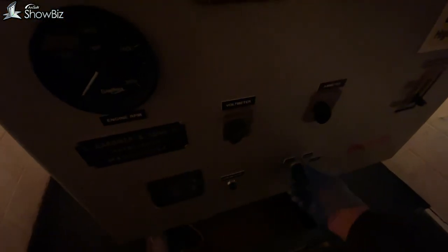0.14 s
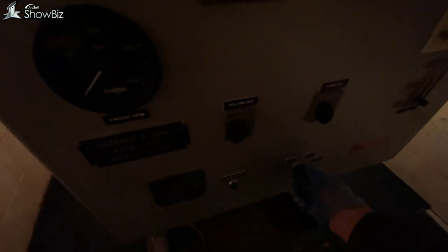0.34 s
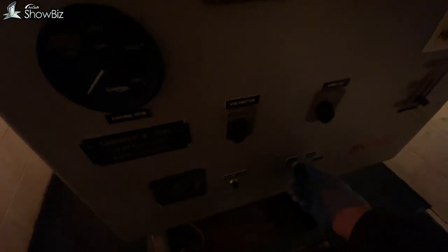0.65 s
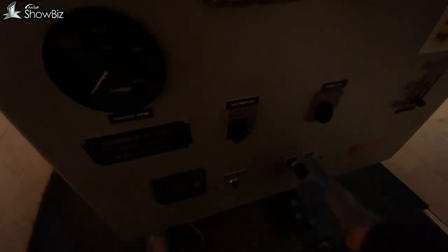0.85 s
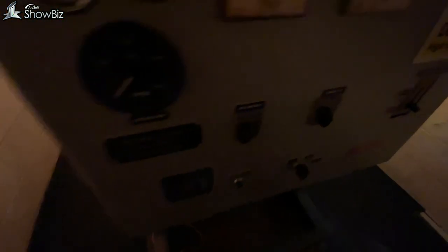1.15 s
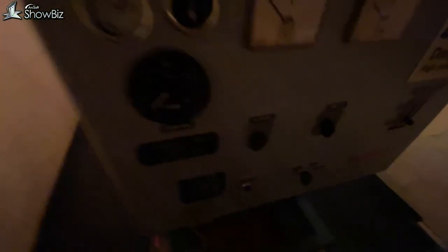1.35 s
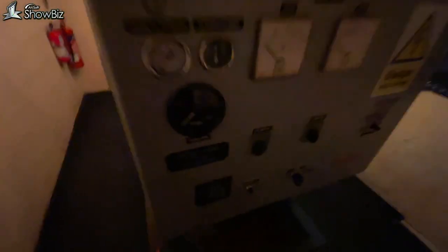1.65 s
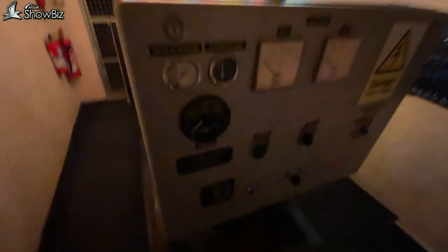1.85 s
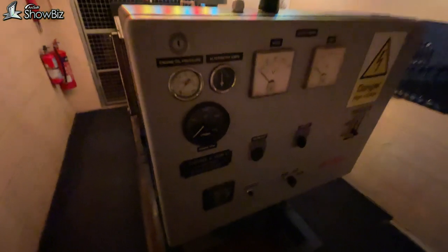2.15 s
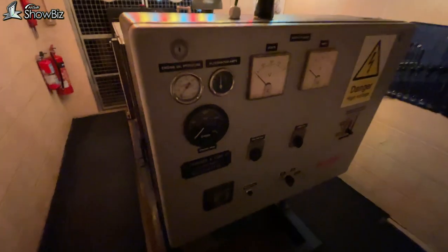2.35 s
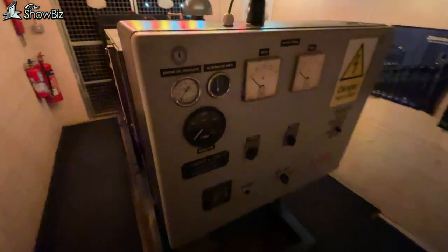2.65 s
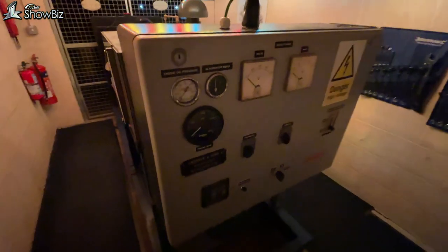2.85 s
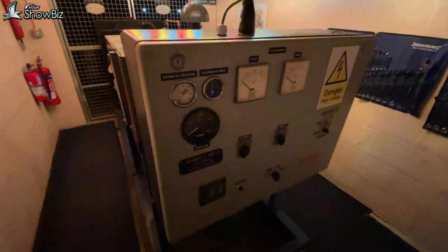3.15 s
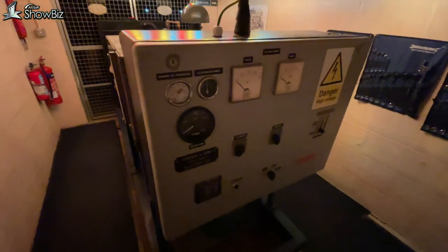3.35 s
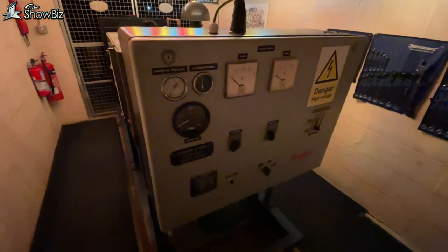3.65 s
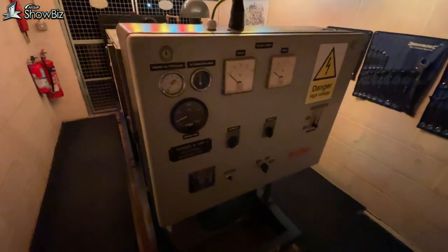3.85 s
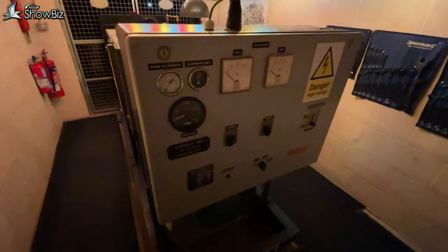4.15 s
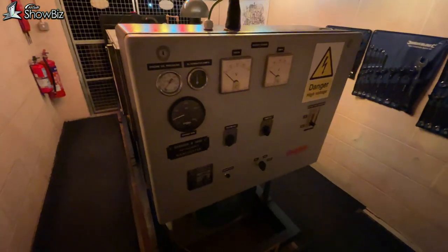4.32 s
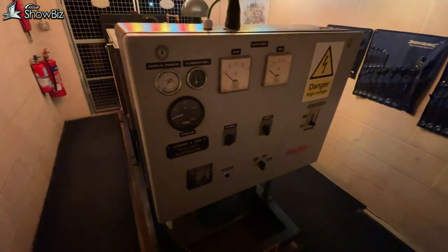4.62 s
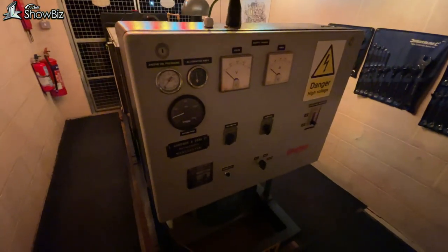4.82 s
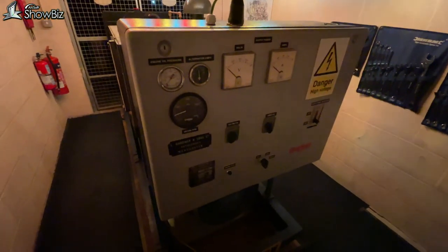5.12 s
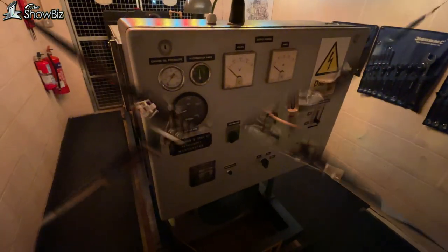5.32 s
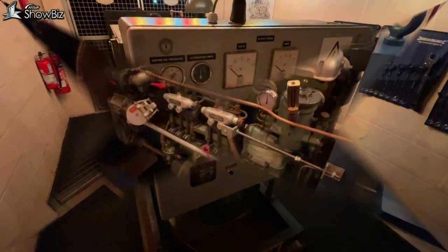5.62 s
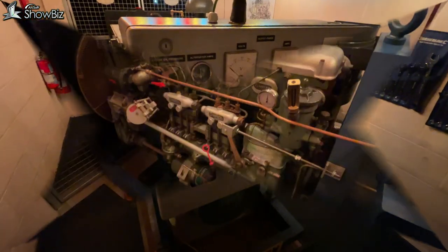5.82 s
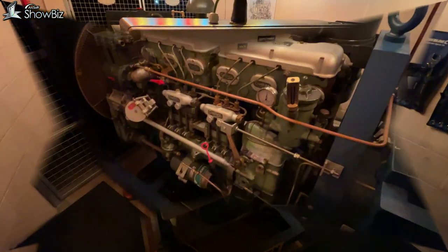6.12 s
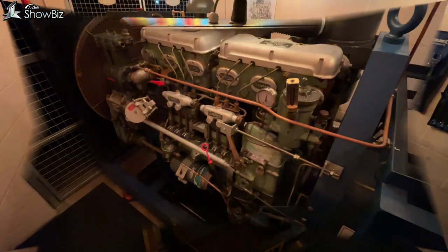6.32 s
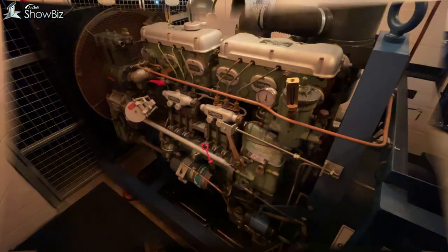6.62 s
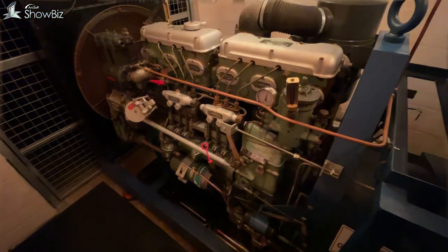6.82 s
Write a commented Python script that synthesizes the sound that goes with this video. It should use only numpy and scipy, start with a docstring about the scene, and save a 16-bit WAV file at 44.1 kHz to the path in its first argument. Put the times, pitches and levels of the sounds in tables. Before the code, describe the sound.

In a small hard-walled shed, a heavy diesel engine cranks into life, settles to clattering idle, then suddenly sounds closer with deep hum and belt squeaks.

```python
"""A solenoid clacks and a starter crashes into mesh and whines, in a small, hard-walled engine shed.
A big six-cylinder diesel catches, flares and hunts round a slow idle, heard from behind the control panel.
From 5.3 s the microphone is right beside the block: settled idle, deep hum under the knocking, belt squeaks.
Noise impacts through filters make the metal and hiss; decaying modes ring, and swept sines whine and chirp."""
import sys
import numpy as np
from scipy import signal
from scipy.fft import rfft, irfft, next_fast_len
from scipy.io import wavfile
from scipy.ndimage import uniform_filter1d

SR = 44100
rng = np.random.default_rng(int(sys.argv[2]) if len(sys.argv) > 2 else 0)


def wav_out(sig):
    """Save sig, one row per channel (or a flat mono array), as 16-bit PCM at SR to the path in sys.argv[1]."""
    wavfile.write(sys.argv[1], SR, np.round(np.clip(np.atleast_2d(sig).T, -1, 1) * 32767).astype(np.int16))


N = 307377
TIME = np.arange(N) / SR

# Solenoid, then pinion. Each row: start in s, level in dB, time before the chatter dies in s,
# treble tilt in dB per octave.
CLACKS = [(0.059, -23.5, 0.023, -0.5), (0.123, -21, 0.054, -9.5), (0.137, -17.5, 0.017, 5.5)]
# Compression strokes while cranking. Each row: time in s, scraping in dB, thud in dB.
STROKES = [(.39, -34, -27), (0.58, -25, -28), (0.756, -30.5, -54), (.89, -52, -54), (1.01, -57, -49),
           (1.11, -37, -35)]
# Resonances of the knocking and hissing metal, with a thin whistle near 5.4 kHz.
# Each row: frequency in Hz, width in Hz, lift in dB.
BLOCK_MODES = [(1010, 61, 3.5), (1140, 79, 8.5), (1426, 100, -2.5), (1980, 92, 0), (2010, 230, 4.5),
               (2254, 81, 3), (3110, 120, 4), (3416, 91, -0.5), (5420, 20, 7.5)]
# Sharp edge of a firing. Each row: frequency in Hz, relative level in dB per Hz.
TICK = [(600, -32), (1500, -10), (2200, 0), (2700, 1), (3300, 2), (4000, -7.5), (5500, -22), (9000, -20.5),
        (13000, -52)]

MESH_S, RELIEF_S, FREE_S = 0.1124, 0.68, 0.9  # pinion enters the ring gear, is relieved, lets go
BALANCE_DB = 4  # spread in strength among the modes of a blow, and from slap to slap


def amp(db):
    """Turns dB into a gain."""
    return np.exp(np.asarray(db) * (np.log(10) / 20))


def evened(x):
    """Scales to rms 1."""
    return x / np.sqrt(np.mean(x ** 2) + 1e-20)


def read(points, hz):
    """Reads a spectrum on a log-frequency axis."""
    f, value = np.transpose(points)
    return np.interp(np.log(hz + 1), np.log(f + 1), value)


def curves(rows):
    """One curve over time for each column after the first, which is in seconds."""
    s, *columns = np.transpose(rows)
    return [np.interp(TIME, s, c) for c in columns]


def fade_in(s, length):
    """Rises from 0 to 1, starting at s."""
    return np.clip((TIME - s) / length, 0, 1)


def held(s, rise, until, decay):
    """Rises at s, holds, then dies away."""
    return fade_in(s, rise) * np.exp(-np.clip((TIME - until) / decay, 0, 30))


def swell(s, width):
    """A smooth hump centred on s."""
    return np.exp(-.5 * ((TIME - s) / width) ** 2)


def convolve(x, response):
    """Passes x through an impulse response."""
    x = np.atleast_2d(x + 1e-12).astype(np.float32)
    response = np.atleast_2d(response + 1e-12).astype(np.float32)
    return signal.oaconvolve(x, response, axes=1)[:, :N].astype(float)


def wobble(size, channels=1):
    """Smoothed noise, averaged over size samples; rms 1."""
    return evened(uniform_filter1d(rng.standard_normal((channels, N)), size=size))


def waver(size):
    """Two unrelated wobbles that turn about every size samples; rms 1."""
    steps = np.arange(0, N + size, size)
    targets = rng.standard_normal((2, len(steps)))
    return evened(np.array([np.interp(TIME, steps / SR, row) for row in targets]))


def grit(grain_db=0):
    """Two noises made of tiny impacts whose sizes spread by grain_db."""
    sizes = np.repeat(amp(grain_db * rng.standard_normal(N // 32 + 1)), 32)[:N]
    return evened(rng.standard_normal((2, N), dtype=np.float32) * sizes)


def lift(modes, hz):
    """dB that a set of resonances adds at a frequency."""
    return sum(db / (1 + (2 * (hz - f) / width) ** 2) for f, width, db in modes)


def colour(x, spectrum, modes=()):
    """Causal filter: a broad spectrum with narrow resonances standing on it; rms 1."""
    hz = abs(np.fft.fftfreq(8192, 1 / SR))
    db = read(spectrum, hz) + lift(modes, hz)
    # minimum phase: the response starts at once and never rings ahead of a blow
    response = np.fft.ifft(np.exp(np.conj(signal.hilbert(np.log(amp(db)))))).real
    return evened(convolve(x, response[:len(hz) // 2]))


def ring(x, modes):
    """Drives a set of modes that die faster the wider they are; rms 1."""
    t = TIME[:SR // 2]
    response = 0
    for hz, width, db in modes:
        dying = np.exp(-np.pi * width * t)
        response = response + amp(db) * np.sqrt(width) * dying * np.sin(2 * np.pi * hz * t)
    return evened(convolve(x, response))


def sing(modes):
    """Modes kept ringing at an even strength, each wandering in pitch in scale with its width; rms 1."""
    out = np.zeros((2, N))
    for hz, width, db in modes:
        pitch = hz + .5 * width * waver(size=400)
        out += amp(db) * np.sin(2 * np.pi * np.cumsum(pitch, axis=1) / SR)
    return evened(out)


def blows(times, db, rise, decay):
    """Envelope of a series of blows, each swelling and dying; rms 1."""
    train, t = np.zeros(N), TIME[:SR // 3]
    np.add.at(train, np.clip(np.round(times * SR).astype(int), 0, N - 1), amp(db))
    return evened(convolve(train, (1 - np.exp(-t / rise)) * np.exp(-t / decay))[0])


def shed(x, wet_db):
    """Adds the dense, short echo of the walls: noise that dies at its own rate in each band."""
    # Echo of the shed. Each row: frequency in Hz, time to fall by 60 dB in s.
    echo_times = [(60, 0.22), (300, 0.47), (1000, 0.38), (4000, 0.17), (12000, 0.021)]
    hz, t, z = signal.stft(rng.standard_normal((2, SR // 2)), SR, nperseg=256)
    tail = signal.istft(z * amp(-60 * t / read(echo_times, hz)[:, None]), SR)[1]
    echo = convolve(x, tail / np.linalg.norm(tail[0]))
    return (x + amp(wet_db) * echo) / np.hypot(1, amp(wet_db))


def background():
    """The steady noise floor of the shed: filtered noise, weighted to the bass."""
    # Noise floor. Each row: frequency in Hz, relative level in dB per Hz.
    floor_spectrum = [(20, -4), (50, 1), (150, -8.5), (300, -17), (800, -16), (3000, -28.5), (12000, -34)]
    return amp(-44) * colour(grit(), floor_spectrum)


def belt(length=0.05, start_hz=770, end_hz=830, tremble=0.025, squeak_db=-14.5, wet_db=-5):
    """About once an engine cycle at idle the belt squeaks: a short, unsteady tone that slides upward."""
    first_s, period_s = 5.518, .2615
    progress = (np.maximum(TIME - first_s, 0) % period_s / length).clip(0, 1)
    hz = (start_hz + (end_hz - start_hz) * progress) * (1 + tremble * wobble(250)[0])
    tone = np.sqrt(2) * np.sin(2 * np.pi * np.cumsum(hz) / SR)
    return shed(amp(squeak_db) * np.sin(np.pi * progress) * tone, wet_db)


def coasting(width=.016, tremble=.016, wet_db=-7):
    """The overrunning pinion chirps thinly, drifting lower, as it runs down: trembling sines in humps."""
    # Pinion chirps. Each row: centre in s, pitch in Hz, level in dB.
    chirps = [(.745, 4130, -35), (.875, 4230, -36), (.905, 4170, -40), (.985, 3930, -38), (1.07, 3880, -39),
              (1.145, 3900, -39), (1.21, 3830, -45)]
    hz = curves(chirps)[0] * (1 + tremble * wobble(100, channels=2))
    turns = np.cumsum(hz, axis=1) / SR
    level = sum(amp(db) * swell(s, width) for s, _, db in chirps)
    return shed(level * np.sin(2 * np.pi * turns), wet_db)


def ratchet(width=0.016, wet_db=-6):
    """With the load off, the loose pinion rattles against the teeth in short bursts of ringing grit."""
    # Bursts of rattle. Each row: centre in s, level in dB.
    bursts = [(.665, -47), (.74, -22.5), (.82, -28), (.885, -26.5)]
    # What the loose pinion rattles with. Each row: frequency in Hz, width in Hz, level in dB.
    rattle_modes = [(578, 26, 7), (860, 23, 10), (1050, 57, -5), (1240, 120, -7), (1620, 90, 9)]
    level = sum(amp(db) * swell(s, width) for s, db in bursts)
    return shed(level * ring(grit(grain_db=2), rattle_modes), wet_db)


def flywheel(rubbed_db=-33, rubbed_decay=0.05, strike_rise=0.0042, strike_decay=0.039):
    """The ring gear sings while the pinion rubs it, and rings out when struck."""
    # The pinion strikes going in and coming out. Each row: start in s, level in dB.
    strikes = [(.145, -16.5), (.8, -19), (.854, -20)]
    # Modes of the ring gear. Each row: frequency in Hz, width in Hz, level in dB.
    ring_gear_modes = [(567, 26, 5.5), (843, 28, -10), (1220, 40, -6.5), (1630, 57, -10)]
    level = amp(rubbed_db) * held(CLACKS[0][0], 0.043, FREE_S, rubbed_decay)
    level = level + sum(amp(db) * held(s, strike_rise, s + strike_rise, strike_decay) for s, db in strikes)
    return level * sing(ring_gear_modes)


def solenoid(wet_db=-4, rattle_decay=0.024):
    """Steel slams on steel and chatters for a moment: short bursts of filtered grit."""
    # Steel on steel. Each row: frequency in Hz, relative level in dB per Hz.
    clack_spectrum = [(120, -29.5), (300, -1.5), (550, 10), (1100, -1), (1620, 9.5), (2000, -11),
                      (3000, -6), (5500, -9), (7500, -20), (11500, -11), (12800, -57)]
    out = np.zeros((2, N))
    for s, db, length, tilt_db in CLACKS:
        chatter = held(s, 0.0027, s + length, rattle_decay)
        spectrum = [(f, level + tilt_db * np.log2(f / 1000)) for f, level in clack_spectrum]
        burst = colour(grit(grain_db=-2.5) * chatter, spectrum)
        out += amp(db) * np.sqrt(np.mean(chatter ** 2)) * burst
    return shed(out, wet_db)


def gear_whine(mesh_hz, teeth, whine_db=-18.0, rise=0.14, limp=0.23, wet_db=-5):
    """Tooth mesh sounds eight wavering harmonics through the starter housing, which rings on after them."""
    # How strongly the housing radiates each harmonic of the mesh. Each row: frequency in Hz, level in dB.
    radiation = [(150, -12), (200, -6), (240, -2), (290, -1), (360, -2), (460, -3), (580, -.5), (720, 2),
                 (840, 5.5), (930, -2), (1070, 3), (1170, 3), (1260, 0), (1380, -1), (1480, -9), (1820, -7),
                 (2300, -22)]
    # The housing rings on as the whine sweeps past. Each row: frequency in Hz, width in Hz, level in dB.
    housing_modes = [(283.8, 7, 0)]
    end_s, decay_s = .622, .014  # the whine stops as the load comes off
    flicker_db, slip = 2.5, .04  # waver of each harmonic in level and in phase (turns, growing with order)
    harmonics = []
    for k in range(1, 9):
        level = amp(read(radiation, k * mesh_hz)) * amp(flicker_db * waver(size=300))
        phase = k * teeth + rng.random((2, 1)) + slip * np.sqrt(k - 1) * waver(size=200)
        harmonics.append(level * np.cos(2 * np.pi * phase))
    # every other tooth bites harder
    whine = harmonics[0] + sum(harmonics[1:]) * (1 + limp * np.cos(np.pi * teeth))
    whine = amp(whine_db) * evened(whine) * held(MESH_S, rise, end_s, decay_s)
    housing = amp(-15) * np.sqrt(np.mean(whine ** 2)) * ring(whine, housing_modes)
    return shed(whine + housing, wet_db)


def starter(crash_db=3, crash_hold=0.053, crash_decay=0.014, grind_db=-21.5, grind_rise=0.04,
            scrape_db=-36.5, stroke_width=0.043, flutter=0.0078, wet_db=-5):
    """Pinion teeth whine, grind and scrape on the ring gear at an uneven speed set by the cranking load."""
    # Starter gear mesh. Each row: time in s, teeth meeting per second in Hz.
    mesh = [(.13, 150), (.2, 190), (.25, 238), (.3, 268), (.34, 296), (.38, 354), (.415, 363), (.445, 350),
            (.475, 304), (.5, 288), (.52, 305), (.548, 412), (.59, 460), (.61, 462), (.632, 416),
            (.665, 400), (.72, 310)]
    # Grinding teeth. Each row: frequency in Hz, relative level in dB per Hz.
    grind_spectrum = [(60, -14), (170, -10), (280, -4), (560, 3.5), (900, 4), (1300, 1), (1800, -8.5),
                      (2600, -12), (5000, -33)]
    # Scraping teeth. Each row: frequency in Hz, relative level in dB per Hz.
    scrape_spectrum = [(1200, -33), (2500, 4), (4200, 3.5), (6000, -6), (7200, -8.5), (11500, -15.5),
                       (12600, -73)]
    # What the scraping teeth ring. Each row: frequency in Hz, width in Hz, lift in dB.
    scrape_modes = [(1810, 60, 6), (3130, 90, 2), (3315, 60, 4), (4085, 90, 2.5), (5040, 50, 4),
                    (5900, 160, 3)]
    grind_decay_s, scrape_decay_s = .4, .14  # both ease off once the pinion is relieved
    mesh_hz, = curves(mesh)
    teeth = np.cumsum(mesh_hz * (1 + flutter * wobble(200)[0])) / SR

    # each tooth strikes as it enters, some harder than others, and rubs between bites
    bite = amp(4 * rng.standard_normal(N).clip(-2, 2))[teeth.astype(int)]
    contact = .2 + bite * np.exp(-(teeth % 1) / .14)  # the bite dies in a fraction of a tooth
    # the teeth meet hardest at first
    crash = 1 + amp(crash_db) * held(MESH_S, grind_rise, MESH_S + crash_hold, crash_decay)
    grind = amp(grind_db) * crash * held(MESH_S, grind_rise, RELIEF_S, grind_decay_s)
    scrape = amp(scrape_db) * held(MESH_S, grind_rise, RELIEF_S, scrape_decay_s)
    scrape = scrape + sum(amp(db) * swell(s, stroke_width) for s, db, _ in STROKES)
    noise = grind * shed(colour(grit() * contact, grind_spectrum), wet_db)
    noise += scrape * shed(colour(grit() * np.sqrt(contact), scrape_spectrum, scrape_modes), wet_db)
    # the noise dies once the pinion is free
    return gear_whine(mesh_hz, teeth) + noise * held(MESH_S, grind_rise / 2, FREE_S, .09)


def cranking(thud_lead=0.032, thud_rise=0.0052, thud_decay=0.029, clank_rise=0.0057, clank_decay=.024,
             crack_decay=0.023, cough_decay=0.02, wet_db=-6):
    """Compression strokes thud through the frame, and the first firings cough, clank and crack."""
    # First firings, growing unevenly. Each row: start in s, clank in dB, crack in dB, thud in dB.
    first_firings = [(0.977, -23, -42, -40), (1.015, -28, -51, -33), (1.058, -26, -45, -34),
                     (1.088, -25, -47, -28), (1.113, -39, -52, -24.5), (1.135, -18, -32.5, -34),
                     (1.203, -20.5, -32, -41), (1.271, -24.5, -38, -33), (1.32, -20.5, -25, -31),
                     (1.388, -24, -38, -29), (1.468, -26, -24.5, -30), (1.546, -33, -31, -23)]
    # What the frame thuds with. Each row: frequency in Hz, width in Hz, level in dB.
    frame_modes = [(59.3, 46, 14), (129, 38, -1)]
    # What the first firings clank with. Each row: frequency in Hz, width in Hz, level in dB.
    clank_modes = [(550, 180, -18), (874, 45, 5), (1180, 64, 5), (1335, 69, 5)]
    # What they thud with. Each row: frequency in Hz, width in Hz, level in dB.
    cough_modes = [(125, 23, 0)]
    thuds = clanks = cracks = coughs = 0
    for s, _, db in STROKES:
        start = s - thud_lead
        thuds = thuds + amp(db) * held(start, thud_rise, start + thud_rise, thud_decay)
    for s, clank_db, crack_db, thud_db in first_firings:
        clanks = np.hypot(clanks, amp(clank_db) * held(s, clank_rise, s + clank_rise, clank_decay))
        cracks = np.hypot(cracks, amp(crack_db) * held(s, clank_rise, s + clank_rise, crack_decay))
        coughs = np.hypot(coughs, amp(thud_db) * held(s, thud_rise, s + thud_rise, cough_decay))
    metal = clanks * ring(grit(), clank_modes)
    metal += cracks * colour(grit(grain_db=2.5), TICK, BLOCK_MODES)
    return shed(thuds * ring(grit(), frame_modes) + metal, wet_db) + coughs * sing(cough_modes)


def exhaust_pipe(times, halfway, strength, intake_db=-2, turbulence=3, puff_spread_db=1.6):
    """Exhaust and intake each puff once a firing into the silencer, which booms on between puffs."""
    # Puffs. Each row: frequency in Hz, relative level in dB per Hz.
    exhaust_spectrum = [(15, -38.5), (30, -10), (44, 1), (58, 10), (78, -1.5), (100, -11.5), (150, -51),
                        (400, -62)]
    # Boom of the silencer. Each row: frequency in Hz, width in Hz, lift in dB.
    silencer_modes = [(59.7, 19, 5.5), (84.3, 10, 8)]
    sizes = np.r_[strength - strength.mean(), np.full(len(halfway), intake_db)]
    sizes = sizes + puff_spread_db * rng.standard_normal(len(sizes))
    puffs = blows(np.r_[times, halfway], sizes, rise=0.001, decay=0.0057)
    return colour(puffs - puffs.mean() + turbulence * puffs * grit(), exhaust_spectrum, silencer_modes)


def knocks(times, db, rise, detune=.025):
    """Each blow rings the block's modes with a balance and tuning of its own; rms 1."""
    # What a combustion knock rings in the block. Each row: frequency in Hz, width in Hz, level in dB.
    knock_modes = [(1020, 26, 3), (1080, 27, -1), (1160, 30, 2), (1253, 28, 0.5), (1366, 28, -5.5),
                   (1467, 26, 0), (1597, 22, -7.5), (1821, 42, -2), (1925, 35, -1), (2017, 33, -3),
                   (2262, 26, -7.5), (2370, 38, -3), (3090, 36, -21), (3310, 43, -18)]
    t = TIME[:SR // 20].astype(np.float32)
    out = np.zeros((2, N + SR))
    hz, width, level = np.transpose(knock_modes)[:, :, None]
    dying = np.float32(amp(level) * np.exp(-np.pi * width * t) * (1 - np.exp(-t / rise)))
    for s, size_db in zip(times, db):
        louder, sharper = rng.standard_normal((2, len(hz), 1)).clip(-2, 2)
        phase = np.float32(2 * np.pi * rng.random((2, len(hz), 1)))
        tones = np.sin(np.float32(2 * np.pi * hz * (1 + detune * sharper)) * t + phase)
        balance = np.float32(evened(amp(BALANCE_DB * louder)))
        out[:, round(s * SR):][:, :len(t)] += amp(size_db) * (balance * dying * tones).sum(1)
    return evened(out[:, :N])


def effort(speed, governor_lag=0.49):
    """Gain of each engine part: it follows the speed and the fuel burnt to gain speed."""
    # Knock, cover ring, exhaust, casing rumble, gear hiss. Each row: dB per doubling of speed, dB on full fuel.
    growth = [(0, 2), (-8.5, -4), (10, 2), (8.5, 3), (6.5, 5)]
    idle_rate = 18  # firings per s at which speed alone changes no level
    full_surge = 27  # gain in firings per s, each second, on full fuel
    rate, = curves(speed)
    surge = uniform_filter1d(np.gradient(rate, TIME), max(int(governor_lag * SR), 1))
    fuel = surge / full_surge
    return [amp(speed_db * np.log2(rate / idle_rate) + fuel_db * fuel) for speed_db, fuel_db in growth]


def engine(speed, cylinders, knock_db, knock_lead, knock_rise, knock_decay, ring_db, ring_rise, puff_db,
           hum_db, casing_db, gear_db, pump_lead, slap_db, pipe_db, clank_db, tick_db, wet_db,
           uneven_db=0.9, rock_delay=0.013, rock_db=-4, pump_share=0.18):
    """Every firing knocks the block, shakes the cover and casing, and sends a puff down the exhaust."""
    # Spectra of knock, casing, gears and liner. Each row: frequency in Hz, relative level in dB per Hz.
    knock_spectrum, casing_spectrum = [(150, -14), (400, -15.5), (680, 5), (920, -17.5), (1100, -3),
                                       (1600, 1), (2000, -6), (2450, -5.5), (2900, -16), (4000, -21.5),
                                       (5500, -24), (9000, -28), (13000, -61)], [(50, -2.5), (100, 1), (160, 0.5), (260, 2),
                                                      (340, -1.5), (470, -4), (650, -9.5), (920, -2.5),
                                                      (1150, -1.5), (2500, -30.5)]
    gear_spectrum, liner_spectrum = [(500, -6.5), (1200, 0), (2400, 10), (3200, 2.5), (4200, -1.5),
                                     (5100, 1), (6400, -2), (7500, -4), (9500, -1), (11500, -0.5),
                                     (12600, -66)], [(300, -45), (600, -32), (920, -12), (1030, -7.5),
                                                    (1400, -10), (2200, -23), (5000, -51)]
    # Resonances of the casing and of a cylinder liner. Each row: frequency in Hz, width in Hz, lift in dB.
    casing_modes, liner_modes = [(275, 13, 6), (328, 20, 3), (377, 56, 4)], [(1030, 53, 4.5), (1180, 96, 12.4), (1440, 36, 3),
                                                       (1484, 61, 4.8)]
    # A loose sheet cover, and thin steel pipes. Each row: frequency in Hz, width in Hz, level in dB.
    cover_modes, pipe_modes = [(845, 36, 7), (810, 39, 7), (765, 44, 7)], [(3750, 80, 5), (3460, 630, 19), (3160, 83, 2)]
    # Level over time of the cover's ring and of the exhaust's boom. Each row: time in s, level in dB.
    cover_level, boom_level = [(1.1, -6), (1.6, -0.5), (2.2, -3.5), (2.9, -1.5), (3.4, 1.5), (4.4, 0.5),
                               (5.2, 1.5)], [(1.1, -6), (1.55, 3.5), (1.75, -1), (2.2, 1), (2.8, -1),
                                                    (3.3, 4), (3.9, 4), (4.4, 2.5), (5.3, 1)]

    # the crank's position, counted in firings
    firings = np.cumsum(curves(speed)[0] * (TIME >= speed[0][0])) / SR
    number = np.arange(int(firings[-1]) + 1)
    times = TIME[np.searchsorted(firings, number + 1e-9)]
    halfway = np.interp(number + .5, firings, TIME)
    strength, shake, rebound, clank, tick = np.array(cylinders)[number % len(cylinders)].T
    chance = rng.standard_normal((len(number), 5)).T
    # rms 1 is taken over the whole length, so allow for the share of it in which the engine runs
    running = np.sqrt(np.mean(firings > 0))
    gains = effort(speed)
    knock, cover, exhaust, casing, gears = (gain * running for gain in gains)

    # each knock is double: the fuel ignites, then the piston rocks against its liner
    ignition = times - knock_lead + 0.00129 * chance[0]
    size = strength + uneven_db * chance[1]
    hits, sizes = np.r_[ignition, ignition + rock_delay], np.r_[size, size + rock_db]
    bang = blows(hits, sizes, knock_rise, knock_decay)
    # pistons and valves slap between the firings
    slap = amp(slap_db) * blows(halfway, 5.2 * chance[2], rise=0.0058, decay=.018)
    strike = np.hypot(bang, slap)
    caught = amp(-8 * (1 - fade_in(1.295, 0.075)))  # the first firings burn weakly
    # slaps ring the block more weakly: slap_db, and 5 dB below that
    slap_sizes = strength.mean() + slap_db - 5 + BALANCE_DB * chance[2]
    rung = knocks(np.r_[hits, halfway], np.r_[sizes, slap_sizes], rise=0.0037)
    gritty = colour(grit(grain_db=3.5) * strike, knock_spectrum, BLOCK_MODES)
    out = amp(knock_db) * knock * caught * (amp(-2.5) * rung + amp(-3) * gritty)
    # the casing rumbles on, a little louder at each blow
    rumble = colour(grit(grain_db=-0.5) * (strike + 8.0), casing_spectrum, casing_modes)
    out += amp(casing_db) * casing * rumble

    # each cylinder has its own voice: some clank dully in the block, others tick brightly
    clanks = blows(ignition, clank, rise=0.0076, decay=0.012)
    dull = colour(grit(grain_db=2) * clanks, liner_spectrum, liner_modes)
    out += amp(clank_db) * knock * caught * dull
    ticks = blows(ignition, tick + uneven_db * chance[3], rise=.003, decay=0.025)
    bright = colour(grit(grain_db=2.5) * ticks, TICK, BLOCK_MODES)
    out += amp(tick_db) * knock * caught * bright
    # the pipes chirp fitfully
    chirps = blows(halfway, 3 * chance[4], rise=.01, decay=0.027)
    out += amp(pipe_db) * caught * ring(grit() * chirps, pipe_modes)
    out = shed(out, wet_db)

    # the cover sings with a wandering pitch, shaken by each firing and again as it rebounds
    shakes = np.r_[shake + uneven_db * chance[3], rebound + uneven_db * chance[2]]
    shaken = blows(np.r_[times, halfway], shakes, ring_rise, decay=.014)
    out += amp(ring_db + curves(cover_level)[0]) * cover * sing(cover_modes) * shaken
    # the gears hiss harder as they drive the fuel pump, just ahead of each firing
    pump = blows(times - pump_lead, size, rise=0.004, decay=0.015)
    hiss = colour(grit(grain_db=0.5) * (1 + pump_share * pump), gear_spectrum, BLOCK_MODES)
    out += amp(gear_db) * gears * hiss
    out += amp(puff_db + curves(boom_level)[0]) * exhaust * exhaust_pipe(times, halfway, strength)
    # the shed booms at twice the firing rate
    hum = np.sqrt(2) * np.cos(4 * np.pi * (firings - .2)) * (firings > 0)
    return out + amp(hum_db) * gains[2] * hum


def ports(x):
    """Two microphone ports: alike in the bass, mostly unrelated in the middle, the left one leading."""
    # Likeness of the ports. Each row: frequency in Hz, likeness from 0 to 1.
    likeness = [(60, .99), (125, .9), (250, .7), (500, .4), (1000, .5), (2000, .3), (4000, .35),
                (6000, .45), (8000, .82), (11500, .95)]
    # Lean to the left. Each row: frequency in Hz, left over right in dB.
    left_lean = [(100, 1.5), (260, -2.5), (450, 1.5), (700, 1.5), (1100, 2.5), (1800, 1), (2900, 4.5),
                 (4700, 6), (6500, 10), (8000, 3), (12000, -2)]
    # Lead of the left port. Each row: frequency in Hz, phase lead in radians.
    left_lead = [(0, 0), (260, .15), (700, 2), (1210, 3.6), (1640, 4.5), (3880, 11.9), (5430, 15.7),
                 (6030, 19.3), (8350, 20.6), (9730, 15.8), (10600, 15.6), (11600, 12.8), (12600, 12.4)]
    size = next_fast_len(N + SR // 10)
    hz = np.fft.rfftfreq(size, 1 / SR)
    a, b = rfft(x, size)
    same = np.clip(read(likeness, hz), 0, 1)
    right = same * a + 1j * np.sqrt(1 - same ** 2) * b
    right = right * np.exp(-1j * np.interp(hz, *np.transpose(left_lead)))
    lean = amp(read(left_lean, hz) / 2)  # half the dB to each side
    return irfft(np.array([a * lean, right / lean]), size)[:, :N]


def scene():
    """The starter and first idle behind the panel, then the settled idle beside the block."""
    # Engine speed behind the panel, then beside the block. Each row: time in s, firings per s.
    speed_panel, speed_block = [(1.136, 14.24), (1.3, 18.29), (1.55, 24.75), (1.8, 24.49), (2.05, 19.17),
                                (2.3, 17.25), (2.55, 16.04), (2.8, 15.12), (3.05, 15.77), (3.3, 18.08),
                                (3.55, 19.96), (3.8, 19.72), (4.05, 18.92), (4.3, 17.71), (4.6, 16.69),
                                (4.9, 16.77), (5.28, 16.91)], [(5.26, 22.98), (7, 22.98)]
    # Cylinders in firing order, at each place. Each row: knock, cover ring, cover rebound, block clank
    # and injector tick, all in dB.
    cylinders_panel, cylinders_block = [(8, 3.5, -17, 3, -17), (6.5, 3.5, -2, -9, 8.5),
                                        (6.5, -2.5, -3.5, 4.5, -14), (7, -1.5, -10.5, -7, 14.5),
                                        (3.5, 3, -1, -6, -3), (5.5, 2, 0, -17, -20)], [(0.72, 1, 3, -3, 2),
                                                                 (0.67, -22, 8, 5.5, 5),
                                                                 (0.7, 5.5, 1, -13, 0),
                                                                 (-0.44, 10, -2, 1, -3.5),
                                                                 (-0.021, 10.5, 0.5, -16, -10.5),
                                                                 (0.52, 8.5, 0, 7, 4)]
    panel = engine(
        speed_panel, cylinders_panel,
        knock_db=-26.5, knock_lead=0.0071, knock_rise=0.0054, knock_decay=0.017,
        ring_db=-26.0, ring_rise=0.021, puff_db=-37.0, hum_db=-75, casing_db=-32.5,
        gear_db=-36.5, pump_lead=0.01, slap_db=-12.0, pipe_db=-43.0,
        clank_db=-33, tick_db=-43, wet_db=-5.0)
    block = engine(
        speed_block, cylinders_block,
        knock_db=-21.0, knock_lead=0.001653, knock_rise=0.017, knock_decay=0.013,
        ring_db=-22.5, ring_rise=0.018, puff_db=-31, hum_db=-32.0, casing_db=-27.5,
        gear_db=-29.5, pump_lead=0.014, slap_db=0, pipe_db=-46.0,
        clank_db=-28.5, tick_db=-35.5, wet_db=-10.0)
    start = solenoid() + starter() + ratchet() + flywheel() + cranking() + coasting()
    behind_panel = start + panel * fade_in(0.7, 0.06)
    beside = fade_in(5.27, 0.023)  # a quick crossfade to the place beside the block
    return ports((1 - beside) * behind_panel + beside * (block + belt()) + background())


def record(dry):
    """The loudest peaks are rounded off; then the recorder's band limit at 12.5 kHz."""
    rounded = dry / (1 + (dry / .9) ** 6) ** (1 / 6)
    band_limit = signal.firwin(255, 12500, window=("kaiser", 8), fs=SR)
    return signal.oaconvolve(rounded, band_limit[None], "same")


dry = scene()
out = record(dry)
wav_out(out)
```